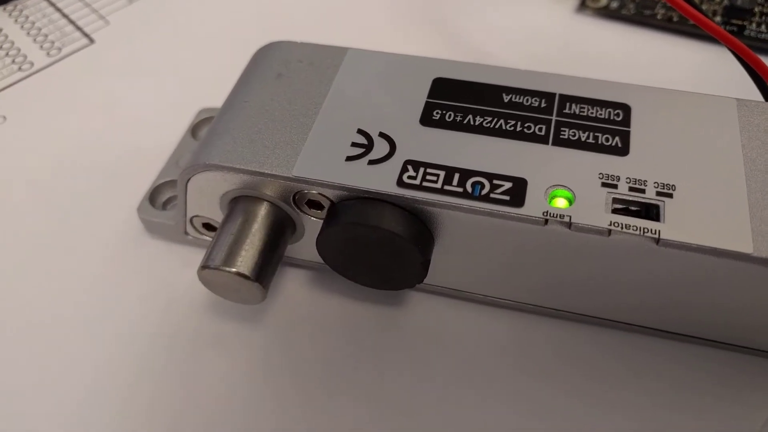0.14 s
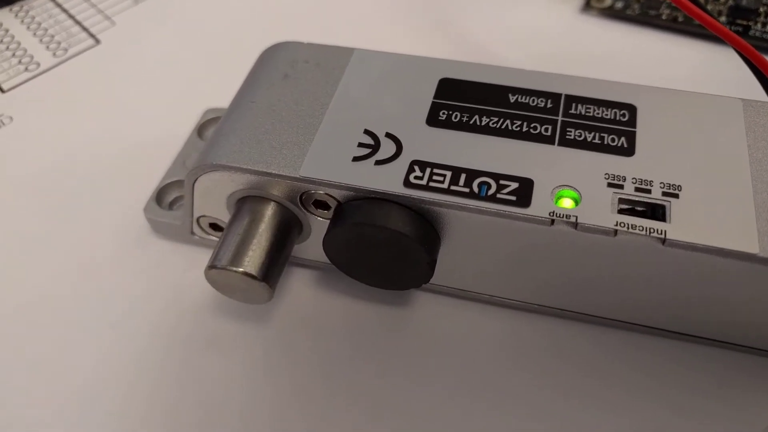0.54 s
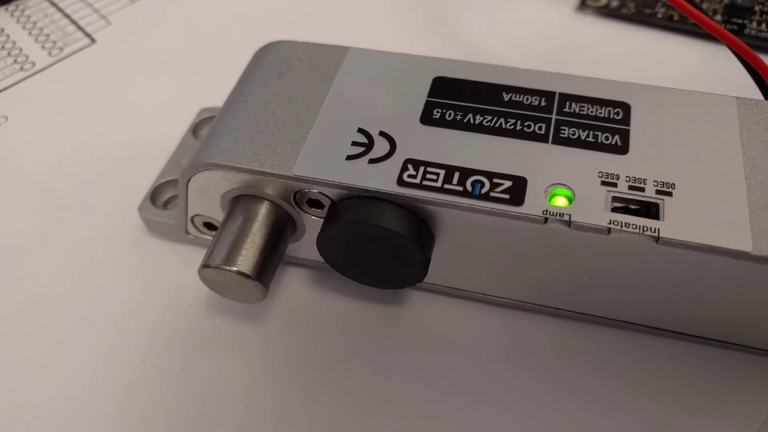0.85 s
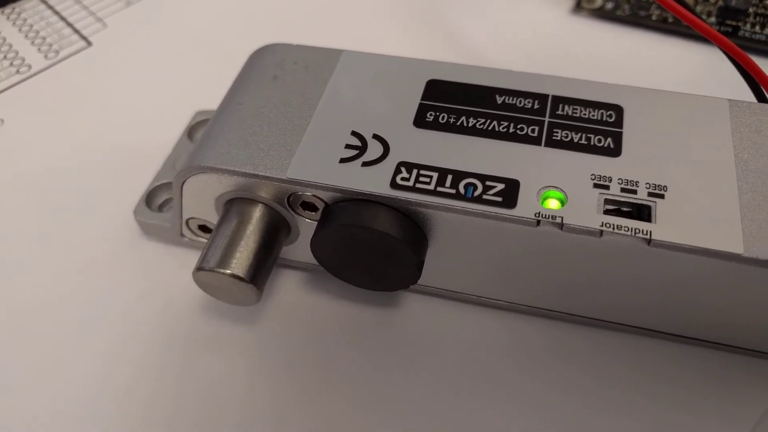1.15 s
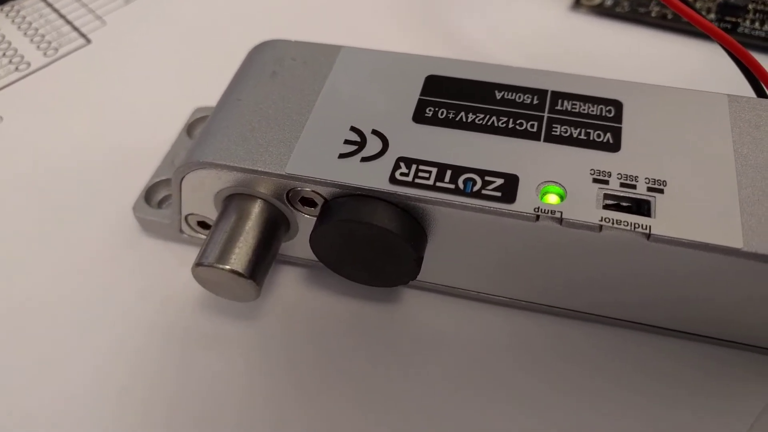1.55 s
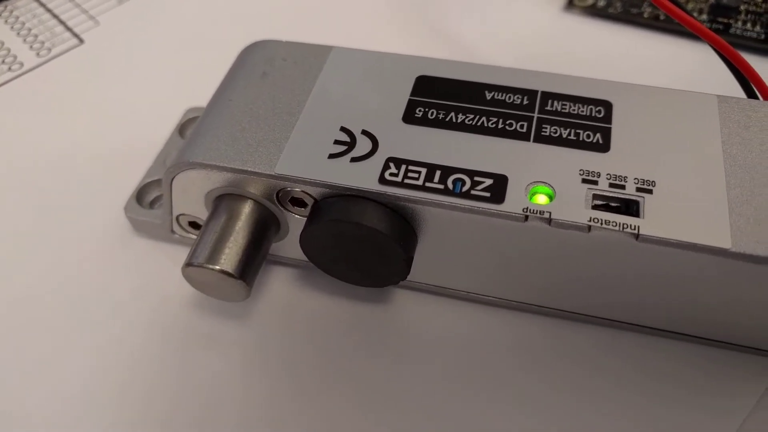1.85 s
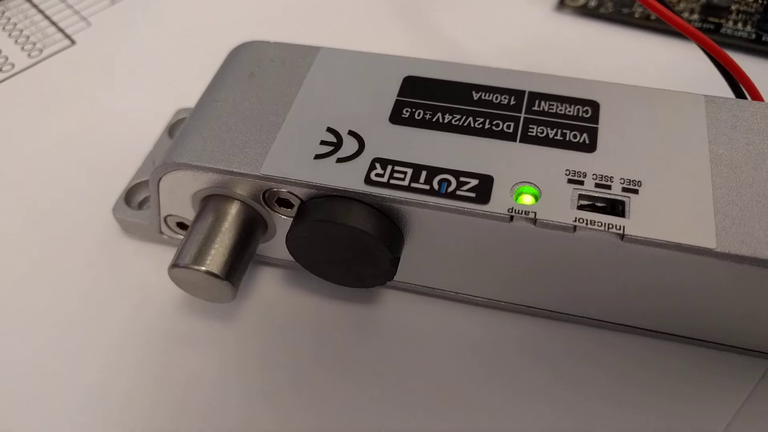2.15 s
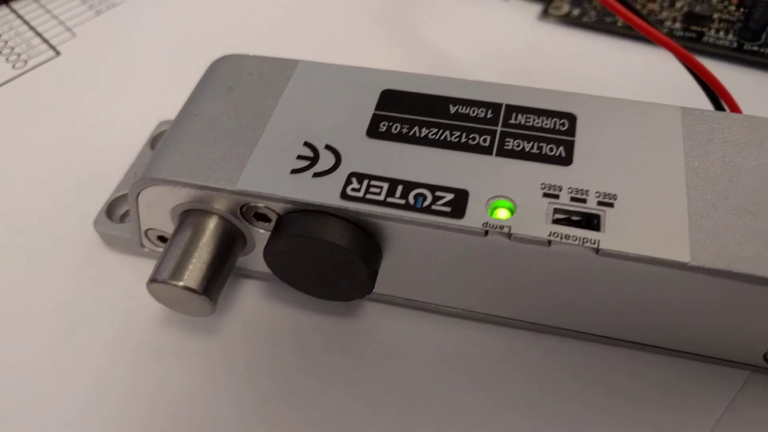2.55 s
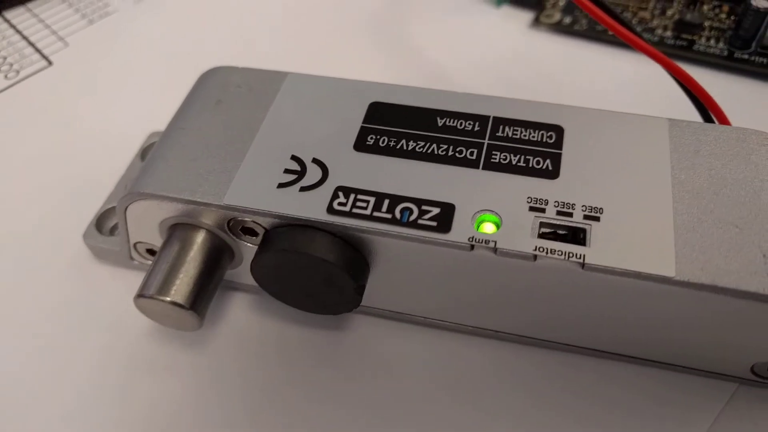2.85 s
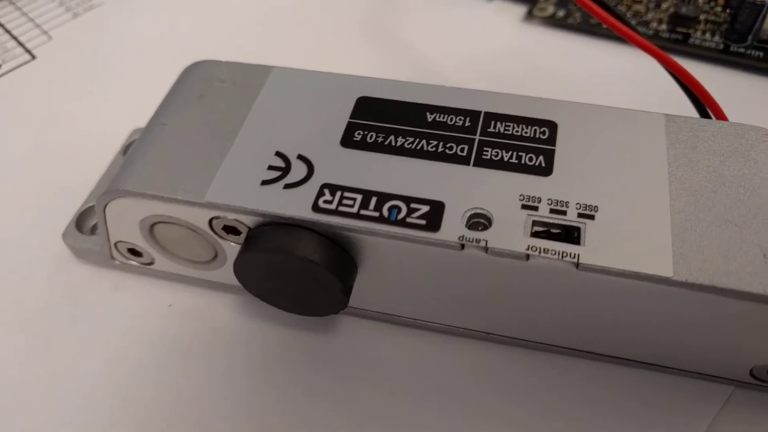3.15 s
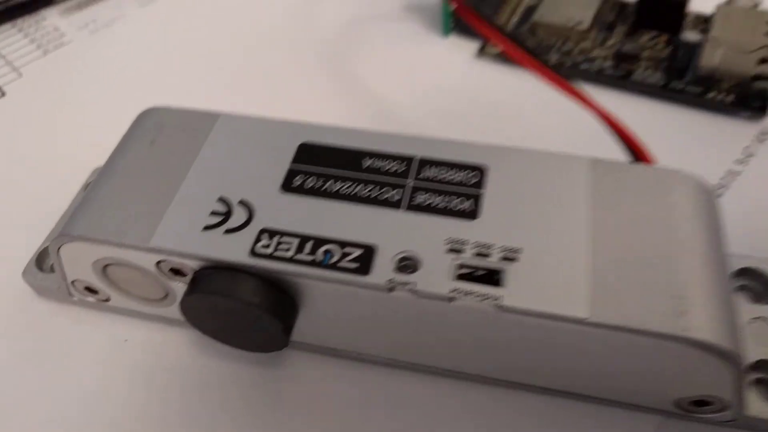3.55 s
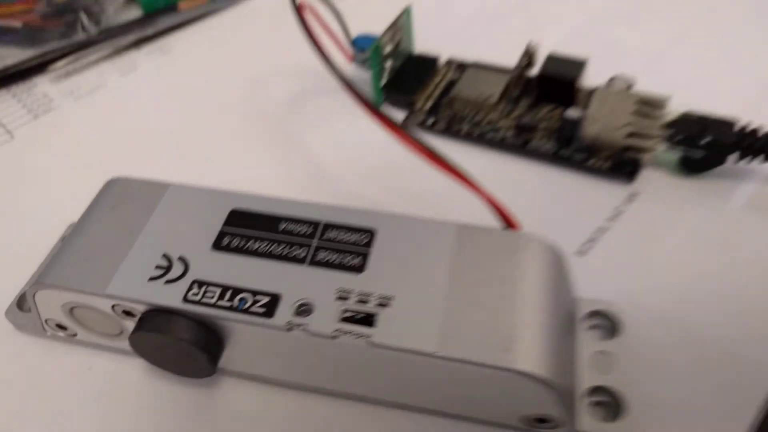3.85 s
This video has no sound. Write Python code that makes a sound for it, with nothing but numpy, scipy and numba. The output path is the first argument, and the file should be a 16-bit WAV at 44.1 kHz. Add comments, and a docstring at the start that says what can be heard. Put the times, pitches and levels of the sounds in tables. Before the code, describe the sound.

Quiet room with low ventilation rumble and faint hum; faint ticks around two and three seconds, then a close, slightly overloaded metallic clack as the lock's bolt snaps in, followed by a short room tail.

```python
"""Electric deadbolt on a desk

Close to the microphone in a quiet room, a few tiny control clicks lead to the latch letting go; the steel
bolt slides back and slams into its stop. Blows are noise cracks over damped modes, the slide is dense noise,
and a decaying noise tail is the room. Filtered noise makes the ventilation rumble, mains hum, tones and whine.
The slam overloads the recorder: its peak clips, then the gain ducks and recovers."""
import sys
import numpy as np
from scipy import signal
from scipy.fft import rfft, irfft
from scipy.io import wavfile
from numba import njit

SR = 44100
rng = np.random.default_rng(int(sys.argv[2]) if len(sys.argv) > 2 else 0)


def pcm_store(signal):
    """Save signal as 16-bit PCM."""
    levels = np.round(np.clip(np.atleast_2d(signal), -1, 1) * 32767)
    wavfile.write(sys.argv[1], SR, levels.astype(np.int16).T)


N = 4 * SR  # four seconds


def amp(db):
    """Decibels to gain."""
    return 10 ** (np.asarray(db) / 20)


def unit(x):
    """Scale to an rms of one."""
    return x / np.sqrt(np.mean(x ** 2))


def curve(points, hz):
    """Read (Hz, value) points on a log-frequency axis."""
    f, v = np.array(points, float).T
    return np.interp(np.log(np.maximum(hz, 1)), np.log(f), v)


def through(x, response):
    """Pass a sound through an impulse response."""
    return signal.fftconvolve(x, response)[:len(x)]


def colour(x, points):
    """Causal minimum-phase filter with the given (Hz, dB) response."""
    size = 2048
    log_gain = np.log(amp(curve(points, np.fft.rfftfreq(size, 1 / SR))))
    # folding the cepstrum onto positive time gives the minimum phase
    cepstrum = irfft(log_gain)
    cepstrum[1:size // 2] *= 2
    cepstrum[size // 2 + 1:] = 0
    return through(x, irfft(np.exp(rfft(cepstrum))))


def add(out, at, x):
    """Mix a sound in at a time in seconds."""
    i = int(at * SR)
    out[i:i + len(x)] += x[:N - i]


def strike(modes, rise_s, tilt_db):
    """Damped modes set ringing by one contact; a harder contact tilts them towards the treble."""
    t = np.arange(SR // 4) / SR
    middle = np.exp(np.mean(np.log([m[0] for m in modes])))
    phases = rng.uniform(0, 2 * np.pi, len(modes))
    ringing = np.zeros(len(t))
    for (hz, db, t60), phase in zip(modes, phases):
        level = amp(db + tilt_db * np.log2(hz / middle))
        decay = np.exp(-np.log(1000) * t / t60)
        ringing += level * np.sin(2 * np.pi * hz * t + phase) * decay
    return ringing * (1 - np.exp(-t / rise_s))


def burst(spectrum, rise_s, decay_s):
    """The short noise of two surfaces meeting: a quick rise, an exponential fall, then colour."""
    t = np.arange(SR // 4) / SR
    envelope = (1 - np.exp(-t / rise_s)) * np.exp(-t / decay_s)
    return colour(rng.standard_normal(len(t)) * envelope, spectrum)


# Blows in the lock: latch release, bolt sliding home, slam. Each row: start in seconds, level in dB,
# rise time constant in seconds, tilt in dB per octave, relative crack in dB, relative bolt ring in dB.
LOCK_BLOWS = [(3.1132, -25, .0004, 0.5, 1, -11), (3.1146, -23, .0006, 8.5, 6, 3),
              (3.1199, -21.5, .0003, 2.5, 5, 8), (3.1425, -34.5, .001, -3, 0, -9),
              (3.1455, -14, .0012, 2.5, -2.5, -10), (3.1515, 3.5, 0.00031, -0.5, -8, -14.5)]
# Modes of the metal case. Each row: frequency in Hz, relative level in dB, t60 in seconds.
CASE_MODES = [(133, -20.5, 0.021), (830, -22, 0.006), (2204, -1, .017), (2354, -1, 0.021),
              (4271, -5, 0.017), (4592, -11.5, .02), (5338, -13.5, 0.015), (5610, -4.5, 0.014),
              (7100, -18, .007), (7584, -6.5, 0.017), (8490, -16, 0.016), (10500, -22, .004)]
# Long-ringing modes of the steel bolt. Each row: frequency in Hz, relative level in dB, t60 in seconds.
BOLT_MODES = [(2490, -3, .048), (4700, -24, .04)]
# Contact noise of steel on steel, also heard in the slide. Each row: frequency in Hz, gain in dB.
STEEL_CONTACT = [(100, 0), (250, -7), (450, -3.5), (850, -1.5), (1400, -8.5), (2300, 1), (3400, -2),
                 (5000, -4.5), (8500, 0.5), (15000, -14)]


def lock():
    """Each blow cracks, rings the case and sets the bolt ringing."""
    out = np.zeros(N)
    for at, db, rise_s, tilt_db, crack_db, bolt_db in LOCK_BLOWS:
        # all cracks share a 2.5 dB lift and a 2.4 ms decay constant
        crack = amp(2.5 + crack_db) * burst(STEEL_CONTACT, rise_s, .0024)
        case = strike(CASE_MODES, rise_s, tilt_db)
        bolt = amp(bolt_db) * strike(BOLT_MODES, rise_s, tilt_db)
        add(out, at, amp(db) * (crack + case + bolt))
    return out


def slide():
    """Dense tiny contacts of uneven strength as the bolt scrapes along its sleeve."""
    start_s, length_s = 3.122, .029
    level_db, unevenness_db = -37, -2  # level before the steel colour
    size = int(length_s * SR)
    contacts, strength = rng.standard_normal((2, size))
    scrape = unit(contacts * amp(unevenness_db * strength))
    out = np.zeros(N)
    add(out, start_s, amp(level_db) * scrape)
    return colour(out, STEEL_CONTACT)


# Small switch clicks. Each row: start in seconds, level in dB, tilt in dB per octave.
SWITCH_CLICKS = [(2.0566, -39, 1), (2.9428, -41, 0), (2.9440, -37, 0), (2.9560, -47, -3)]
# Modes of the switch. Each row: frequency in Hz, relative level in dB, t60 in seconds.
SWITCH_MODES = [(2610, -11, .008), (4763, -12, 0.012), (6700, -3, .008), (8000, 0, 0.011),
                (8550, 0.5, .005), (9900, -2.5, .005)]
# Contact noise of the switch. Each row: frequency in Hz, gain in dB.
SWITCH_CONTACT = [(500, -12.5), (2000, 3), (5700, -2), (6800, 4), (9500, 8), (11000, -5), (15000, -5)]
# One duller tap, a single row: start in seconds, level in dB.
DULL_TAP = (2.9733, -40)
# Modes of the tapped part. Each row: frequency in Hz, relative level in dB, t60 in seconds.
TAPPED_PART_MODES = [(1530, -2, .012), (1820, -6, .008), (2120, 0, .014)]


def ticks():
    """Tiny switch clicks and one dull tap before the lock opens: damped modes, plus contact noise in clicks."""
    rise_s, snap_decay_s = .0003, .0013  # time constants
    out = np.zeros(N)
    for at, db, tilt_db in SWITCH_CLICKS:
        ring = strike(SWITCH_MODES, rise_s, tilt_db)
        snap = burst(SWITCH_CONTACT, rise_s, snap_decay_s)
        add(out, at, amp(db) * (ring + snap))
    at, db = DULL_TAP
    add(out, at, amp(db) * strike(TAPPED_PART_MODES, rise_s, 0))
    return out


# Decay of the room. Each row: frequency in Hz, t60 in seconds.
ROOM_DECAY = [(200, .5), (2300, .46), (5000, .49), (8000, .42), (15000, .28)]
# Colour of the room's echo. Each row: frequency in Hz, gain in dB.
ECHO_COLOUR = [(100, -11), (800, -7.5), (2200, -12), (4400, -9), (7500, -4), (10500, -7), (15000, -14.5)]


def room():
    """A diffuse noise tail that builds up quickly and whose top treble dies first."""
    level_db, gap_s, build_s = -4.5, .005, .004  # level before the echo colour
    t = np.arange(SR) / SR
    hz = np.fft.rfftfreq(SR, 1 / SR)
    noise = rfft(rng.standard_normal(SR))
    tail = np.zeros(SR)
    for k, (_, t60) in enumerate(ROOM_DECAY):
        # overlapping bands that add up to the whole spectrum
        share = curve([(f, j == k) for j, (f, _) in enumerate(ROOM_DECAY)], hz)
        tail += irfft(noise * share) * np.exp(-np.log(1000) * t / t60)
    tail = tail * (1 - np.exp(-np.maximum(t - gap_s, 0) / build_s))
    tail = amp(level_db) * tail / np.sqrt(np.sum(tail ** 2))  # set by total energy
    return colour(tail, ECHO_COLOUR)


# Spectrum of ventilation and microphone hiss. Each row: frequency in Hz, relative density in dB.
AIR_SPECTRUM = [(20, -25), (31, -25), (42, 2.5), (58, 0), (75, -5), (135, -2), (165, -11), (240, -11.5),
                (450, -17), (700, -18.5), (1000, -21), (2100, -22), (3000, -28), (4200, -35), (6300, -38),
                (7500, -35), (9500, -41), (15500, -42.5)]
# Mains hum, fan tones and a thin high whine. Each row: centre in Hz, width at half amplitude in Hz,
# rms level in dB.
STEADY_TONES = [(122.1, 1, -65.5), (239, 13, -66.5), (309, 10, -70.5), (672, 17, -69), (7550, 150, -82),
                (7910, 120, -83)]


def shaped_noise(gain):
    """Steady noise of unit rms whose spectrum follows the gain."""
    return unit(irfft(rfft(rng.standard_normal(N)) * gain, N))


def background():
    """Steady ventilation, mains hum, fan tones and whine, all of filtered noise; narrow bands sound as tones."""
    hz = np.fft.rfftfreq(N, 1 / SR)
    out = amp(-53.5) * shaped_noise(amp(curve(AIR_SPECTRUM, hz)))
    for centre, width, db in STEADY_TONES:
        resonance = 1 / (1 + (2 * (hz - centre) / width) ** 2)
        out += amp(db) * shaped_noise(resonance)
    return out


def scene():
    """Lock and clicks in the room, over the background."""
    bolt, small = lock() + slide(), ticks()
    # the small clicks excite the room 5 dB more strongly for their level
    echo = through(bolt + amp(5) * small, room())
    return (bolt + small + echo + background())[None]


@njit
def follow(x, attack, release):
    """Level follower that rises fast and falls slowly."""
    out, level = np.empty(len(x)), 0.
    for i in range(len(x)):
        level += (x[i] - level) * (attack if x[i] > level else release)
        out[i] = level
    return out


def record(dry):
    """The gain ducks after the slam, the peak clips before it can act, and the top is cut."""
    limit_db, clip_db, top_hz = -11, -3.4, 15750
    attack_s, release_s, lag_s = .002, .075, .0018
    x = dry[0]
    level = follow(np.abs(x), 1 / (attack_s * SR), 1 / (release_s * SR))
    late_level = np.pad(level, (int(lag_s * SR), 0))[:N]
    ducked = x / np.maximum(late_level / amp(limit_db), 1)
    clipped = ducked / (1 + (ducked / amp(clip_db)) ** 4) ** (1 / 4)  # rounded knee
    top_cut = signal.ellip(10, .1, 80, top_hz, fs=SR, output="sos")
    return signal.sosfilt(top_cut, clipped)[None]


dry = scene()
out = record(dry)
pcm_store(out)
```